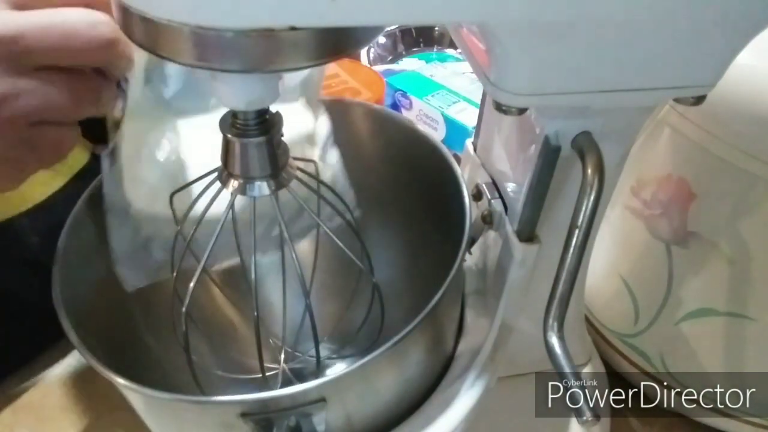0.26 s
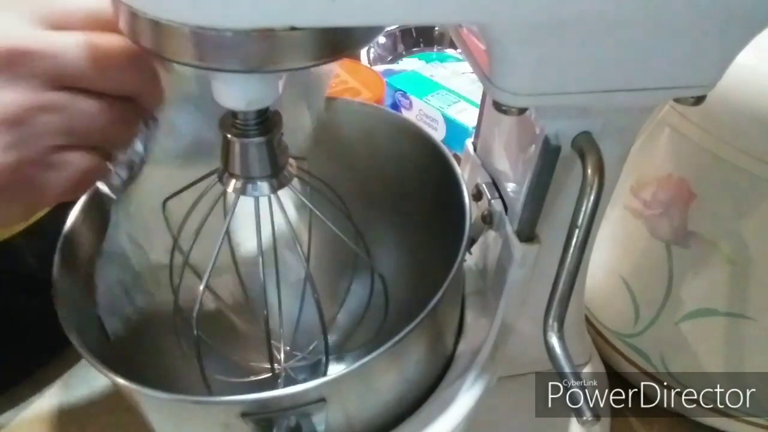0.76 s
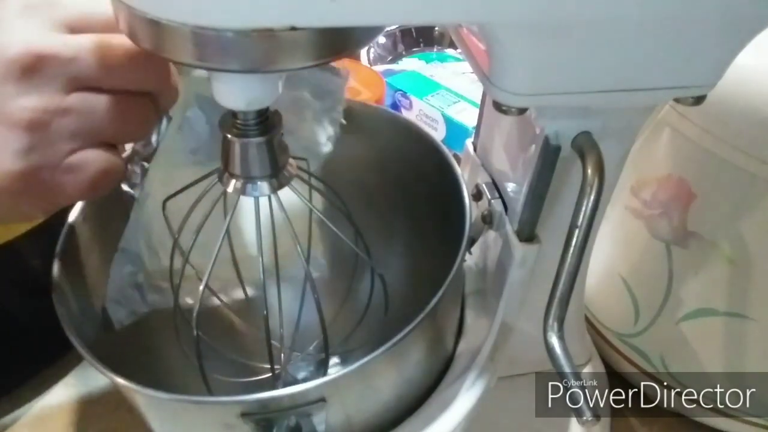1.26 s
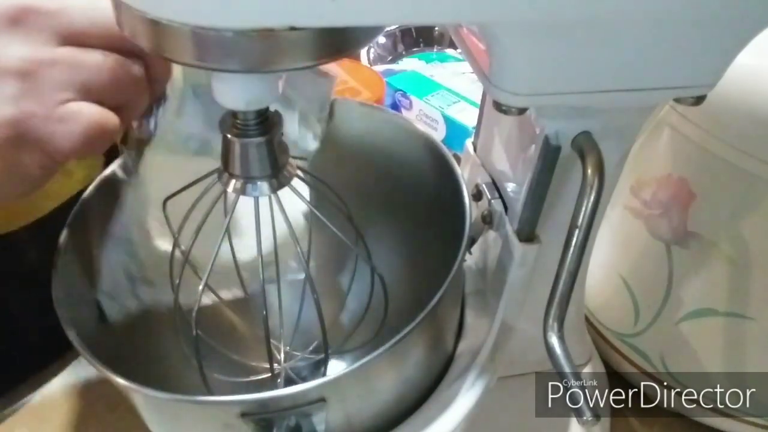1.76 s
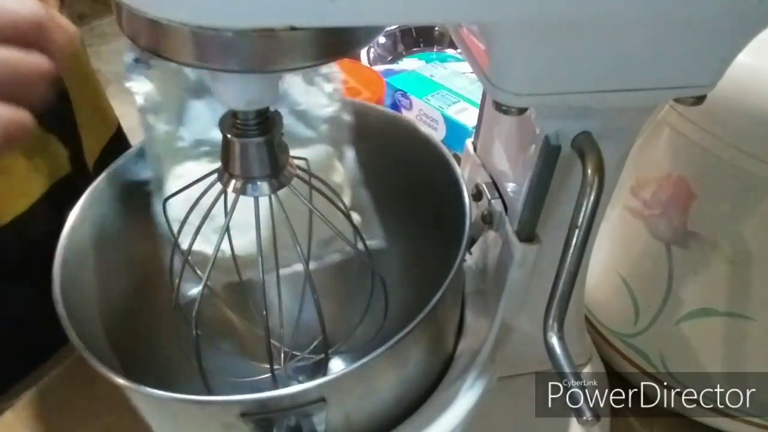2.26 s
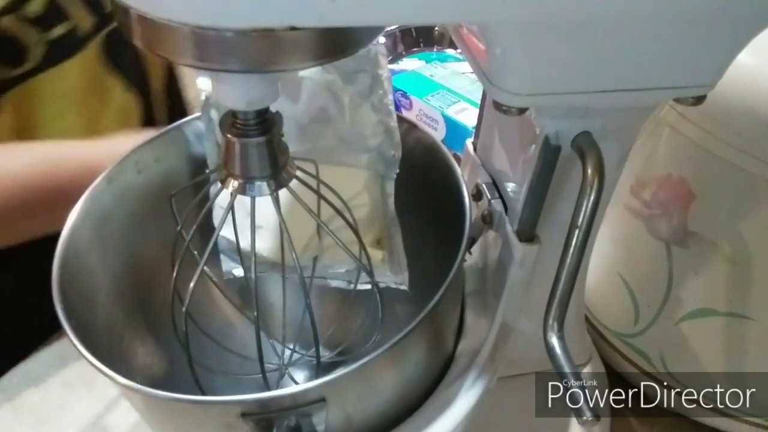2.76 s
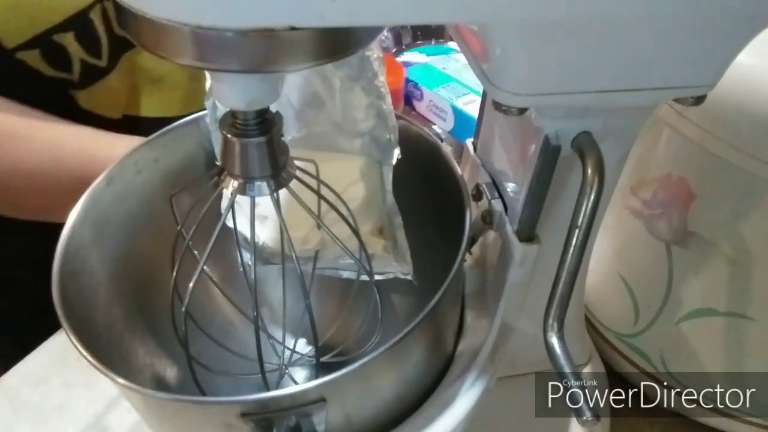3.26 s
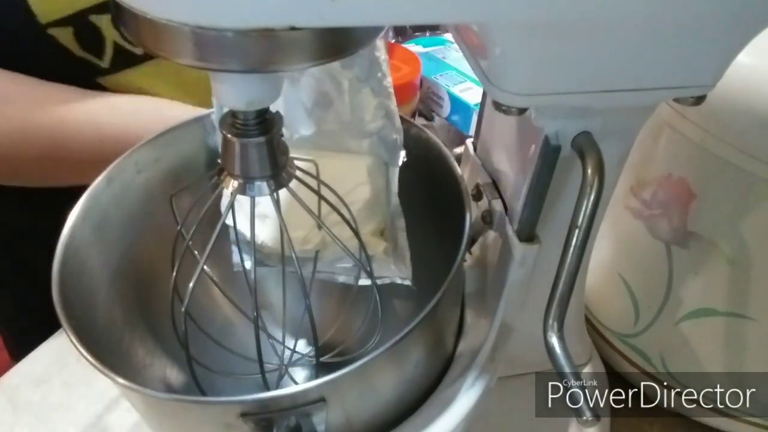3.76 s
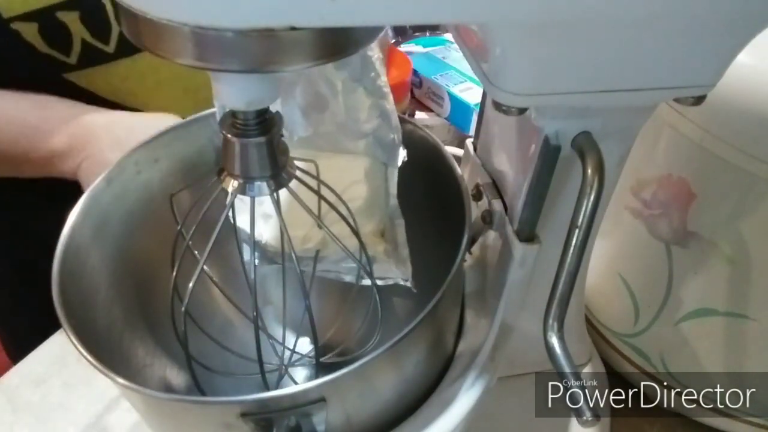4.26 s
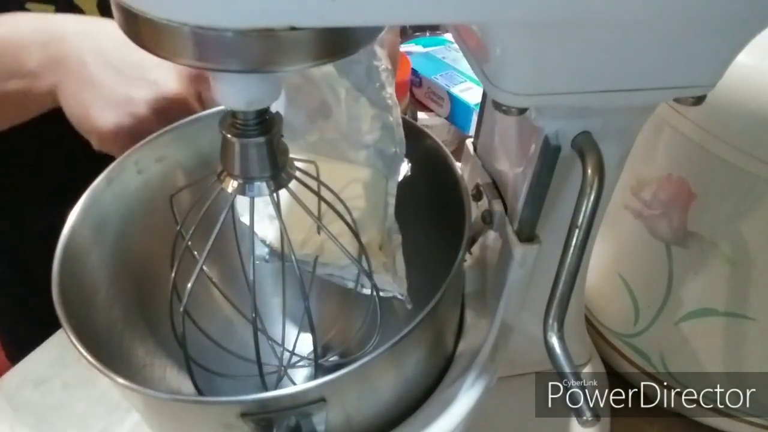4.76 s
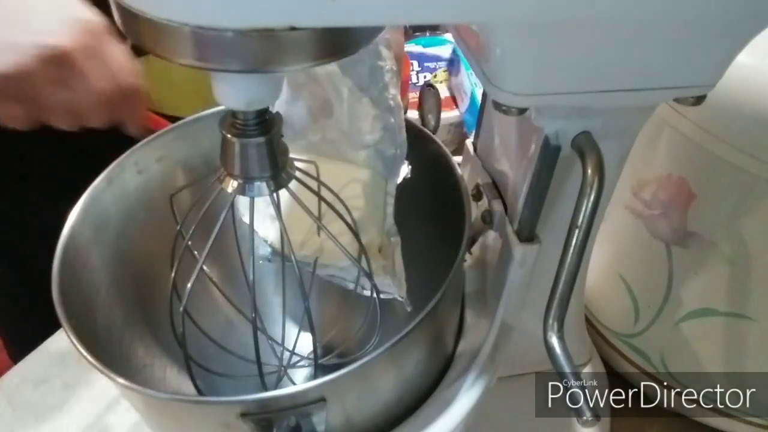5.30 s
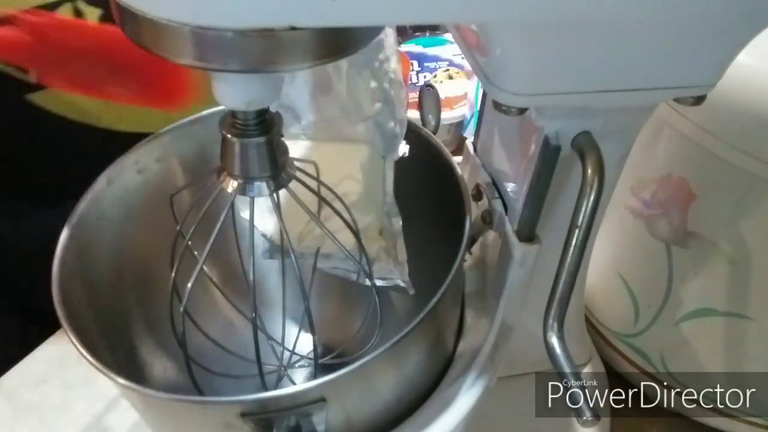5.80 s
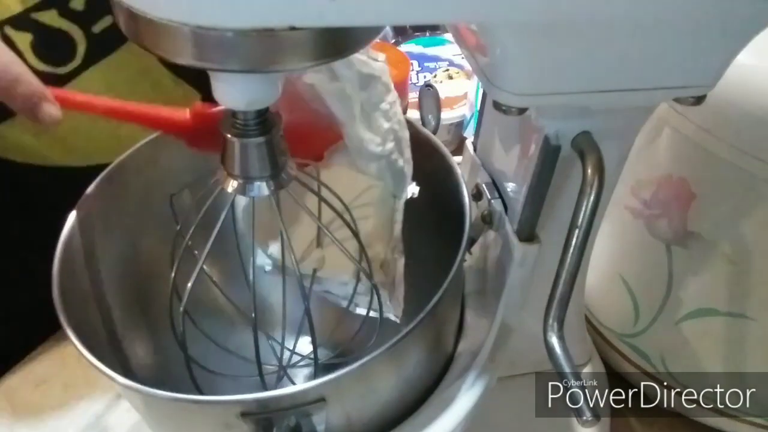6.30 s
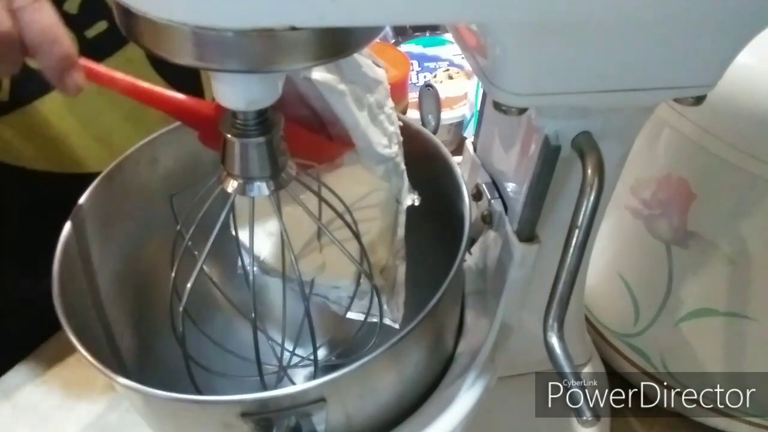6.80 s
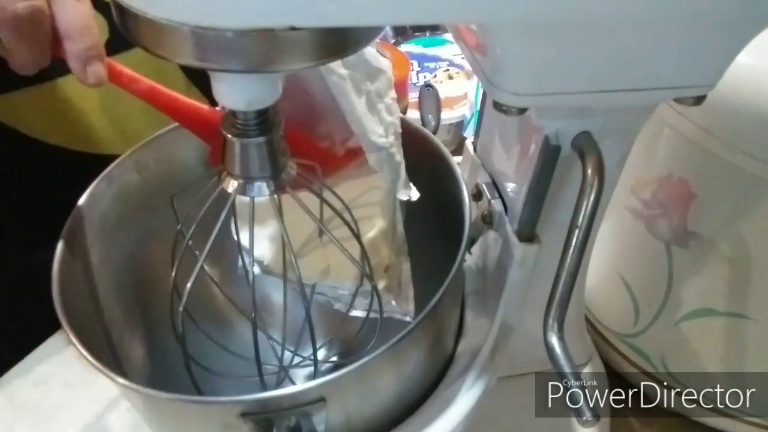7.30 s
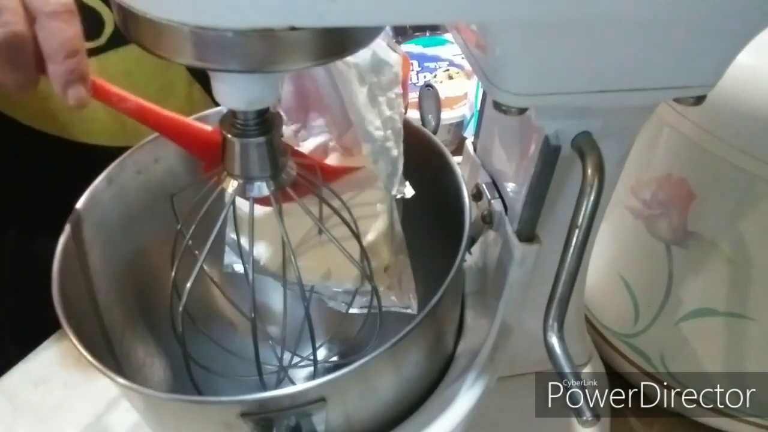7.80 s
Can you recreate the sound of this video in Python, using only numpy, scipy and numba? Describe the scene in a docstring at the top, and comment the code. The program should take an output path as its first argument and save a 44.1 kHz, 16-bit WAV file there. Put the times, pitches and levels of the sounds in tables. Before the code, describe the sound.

Close and slightly hissy: thin foil film rustles and pops in irregular bursts for over two seconds, with a hollow tint from the steel bowl. Sparse dull knocks and rubbing on a counter follow. Just past five seconds comes by far the loudest sound, a double metallic clank with a short clangy ring, then small irregular spatula taps, short scrapes and near silence in a hard-walled kitchen.

```python
"""In a small kitchen, a foil-lined wrapper of cream cheese is squeezed and crumpled over a steel mixing bowl.
Snaps, taps and bumps are short bursts of noise, shaped by filters; rubbing is a stream of tiny random slips.
Things are shifted on the counter, a metal utensil lands and tips flat, ringing as a sum of fading sine waves.
Then a spatula scrapes and taps inside the wrapper. A phone close by hears it all through a small opening
that rings near 9 kHz, and a limiter holds down the loudest peaks."""
import sys
import numpy as np
from scipy import signal
from scipy.fft import rfft, irfft
from scipy.io import wavfile
from scipy.ndimage import uniform_filter1d, minimum_filter1d
from numba import njit

SR = 44100
rng = np.random.default_rng(int(sys.argv[2]) if len(sys.argv) > 2 else 0)


def wrap_up_sound(samples):
    """Save the sound to the file named by the first command line argument, as 16-bit audio."""
    columns = np.atleast_2d(samples).T
    # keep every value between -1 and 1, then stretch to whole-number steps
    tamed = np.clip(columns, -1, 1)
    steps = np.round(tamed * 32767).astype(np.int16)
    wavfile.write(sys.argv[1], SR, steps)


N = 355005
T = np.arange(N) / SR  # time in s

# Event levels are starting points: each layer adds its own gain, and the room and microphone follow.
# held wrapper rubs between the fingers: [t/s, length/s, level/dB, hiss above that level/dB]
WRAPPER_STROKES = [(0, 0.004, -46.5, 20.5), (0.2, 0.46, -65.5, 17.5), (0.72, 0.26, -50, 20),
                   (1.0, 0.47, -51, -8.5), (1.58, 0.21, -52, 19), (1.85, 0.18, -60.5, 19),
                   (1.96, 0.088, -51.5, 12.5), (2.05, 0.22, -59, 16.5)]
# sharp snaps: foil creases, the spatula hitting foil, clicks among the handling:
# [t/s, level/dB, hiss above that level/dB]
SNAPS = [(0.0121, -58.5, 18.5), (0.388, -53, 18.5), (0.477, -39.5, 0.5), (0.6957, -50, 17.5),
         (0.7957, -40, 8), (0.821, -45, 5), (0.882, -55.5, 24), (0.915, -33, 6), (0.927, -25.5, -6),
         (1.386, -37.5, -1), (1.5269, -34, -13), (1.5444, -57, 22), (1.559, -36.5, -22),
         (1.6058, -35.5, -9), (1.6639, -34.5, -18), (1.6717, -40, 1), (1.718, -37.5, -10),
         (1.7465, -39, -14), (1.9203, -46, 5.5), (2.0757, -37.5, -8.5), (2.1599, -37.5, -1),
         (2.212, -33.5, 6), (2.2495, -40.5, 11), (2.283, -37, -6), (2.303, -34.5, 2.5), (2.3277, -54, 23.5),
         (3.086, -59, 30), (4.798, -57, 2.5), (6.0107, -47.5, 14), (7.0165, -49.5, 6.5)]
# faint chance snaps: [from t/s, to t/s, middle level/dB, hiss above the level/dB]
STRAY_SNAPS = (0.2, 2.5, -49, 4)
# fingers, packets and spatula tap on bowl and counter: [t/s, f/Hz, level/dB, edge above that level/dB]
TAPS = [(0.049, 1430, -32, -26), (0.1336, 1310, -46, -23), (3.006, 830, -42, -15),
        (3.1903, 980, -44.5, -20), (3.4123, 940, -36, -35), (3.5423, 520, -41.5, -15.5),
        (3.6199, 1770, -39.5, -16), (3.684, 1670, -43, -29), (3.9576, 1720, -41.5, -16.5),
        (4.063, 2040, -53.5, -11), (4.2697, 1120, -36, -10.5), (4.4128, 1450, -47, -19),
        (4.4497, 1620, -44.5, -8), (4.7054, 1100, -33, -28), (5.0355, 1520, -34.5, -22),
        (5.7447, 1860, -37.5, -20), (5.803, 1600, -46, -14.5), (5.9893, 1054, -39, -3.5),
        (6.0885, 1490, -53, -20), (6.146, 1710, -39, -13), (6.2424, 2160, -46, -24),
        (6.2629, 1300, -43.5, -15), (6.3225, 2060, -28, -8.5), (6.427, 2030, -40, -22),
        (6.473, 1630, -39.5, -32), (6.5498, 1820, -31, -12.5), (6.67, 1400, -56.5, -20),
        (6.9031, 2010, -48.5, -15), (7.163, 1133, -41, -17), (7.2182, 1810, -55.5, -28),
        (7.3352, 2340, -34.5, -30), (7.475, 1310, -51, -11.5), (7.783, 1887, -58.5, -28),
        (7.8059, 1773, -50, -39), (7.892, 1200, -61, -27)]
# faint chance taps: [from t/s, to t/s, middle level/dB, edge above the level/dB]
STRAY_TAPS = (3, 3.5, -48, -33)
# short runs of crackle: the wrapper is squeezed, and later a packet is handled on the counter:
# [t/s, length/s, level/dB, hiss above that level/dB]
CRACKLE_RUNS = [(0.22, 0.016, -47, -2), (0.279, 0.046, -50, 5), (0.373, 0.029, -47.5, 15.5),
                (0.402, 0.038, -40, -8.5), (0.647, 0.05, -53, 4), (0.683, 0.045, -52, 16.5),
                (0.839, 0.06, -50, 14), (0.912, 0.016, -33.5, -1.5), (0.965, 0.042, -51, 23.5),
                (1.038, 0.06, -57.5, 15.5), (1.146, 0.03, -45.5, 13.5), (1.422, 0.04, -48, -0.5),
                (1.509, 0.037, -51, 7.5), (1.603, 0.019, -42, 14.5), (1.654, 0.043, -50.5, 5.5),
                (1.703, 0.082, -45.5, 4.5), (2.129, 0.12, -50.5, 12), (2.26, 0.045, -40.5, 2.5),
                (2.457, 0.043, -61.5, 5.5), (3.211, 0.038, -45.5, 12.5)]
# soft cheese flops against the wrapper or gives under the spatula: [t/s, f/Hz, level/dB]
FLOPS = [(0.226, 670, -41), (0.69, 433, -45), (0.78, 477, -45.5), (0.844, 298, -47.5), (1.44, 550, -46),
         (1.612, 400, -47), (1.655, 424, -36), (1.712, 460, -38.5), (1.955, 383, -48.5), (2.302, 475, -39),
         (6.32, 345, -46), (6.53, 345, -50), (7.465, 340.5, -57)]
# things are pushed about on the counter: [t/s, length/s, level/dB, hiss above that level/dB]
RUMMAGE_STROKES = [(2.45, 2.1, -67.5, 6), (2.99, 0.18, -55.5, 0.5), (3.18, 0.29, -48.5, 3.5),
                   (3.405, 0.038, -43.5, -39), (3.5, 0.31, -55.5, 7), (4.19, 0.015, -47, -6),
                   (4.265, 0.014, -36.5, -4.5), (4.44, 0.017, -54.5, 7.5), (4.7, 0.031, -49, 3)]
# soft bumps on the counter: [t/s, level/dB]
BUMPS = [(3.213, -41.5), (3.41, -40), (3.691, -31), (3.734, -40), (4.207, -49), (4.721, -45),
         (4.796, -50.5)]
# utensil lands on one end, tips over and rattles flat:
# [t/s, level/dB, treble above that level/dB, lies flat 0 or 1, rings freely 0 or 1]
CLANKS = [(5.1186, -10.5, -6.5, 0, 1), (5.3229, -12, -22.5, 1, 1), (5.346, -17.5, -7, 1, 0),
          (5.365, -19.5, -18.5, 1, 0)]
# ringing modes of the utensil: [f/Hz, time to fade by 60 dB/s, level struck on end/dB, level struck flat/dB]
METAL_MODES = [(356, 0.34, -21, -17.5), (674, 0.42, -19, -17), (703, 0.413, -23.5, -19),
               (958, 0.34, -20.5, -14.5), (1011, 0.38, -14.5, -15), (1200, 0.33, -15.5, -24.5),
               (1300, 0.17, -15.5, -13), (1352, 0.35, -18, -14.5), (1410, 0.27, -14.5, -16),
               (1431, 0.27, -11.5, -13), (1700, 0.3, -22.5, -10.5), (1856, 0.3, -21.5, -15),
               (2100, 0.19, -18.5, -18), (2300, 0.35, -20.5, -10), (2405, 0.29, -14, -14),
               (2930, 0.2, -16.5, -22), (2346, .45, -15.5, -9.5), (2361.5, .45, -22, -14.5),
               (4520, .35, -14.5, -36), (4528.6, .35, -14.5, -39), (7140, 0.33, -38, -30.5),
               (8670, 0.33, -28, -41.5), (10530, 0.29, -33.5, -31), (12590, .3, -47, -39),
               (15400, .25, -50.5, -38)]
# spatula drags through the cheese: [t/s, length/s, level/dB, hiss above that level/dB]
SPATULA_STROKES = [(5.88, 0.24, -66.5, 15), (6.23, 0.18, -49.5, 11.5), (6.44, 0.12, -47, -3),
                   (6.6, 0.2, -74.5, 24), (6.79, 0.064, -70, 23), (7.44, 0.012, -49, 9)]
# hollow resonances of the bowl: [f/Hz, width/Hz, level/dB]
BOWL_MODES = [(252, 54, -0.5), (379, 49, 2.5), (965, 64, 2.5), (1062.4, 42, 2.5), (1620, 25, -2.5),
              (1860, 140, -11.5), (3700, 81.6, -10.5)]

# Tone colours: how strong each pitch region is, all [f/Hz, level/dB]
# dull body of a crackle run or tap
BODY_COLOUR = [(85, -26), (150, -11.5), (260, -10.5), (400, -4.5), (560, -2.5), (900, -9), (3000, -67.5)]
# crackling and snapping
CRACKLE_COLOUR = [(250, -11), (550, -2), (1000, -3), (1800, 0), (3200, 2), (4500, -7.5), (6500, -10.5),
                  (12000, -28)]
# fine hiss and sharp edges
HISS_COLOUR = [(2000, -20.5), (4500, -1), (6500, -4.5), (9000, 2), (11500, -2), (14000, -4), (16000, -14.5)]
# wrapper sliding
SLIDE_COLOUR = [(150, -8.5), (420, 5.5), (1000, -2), (3000, -1), (5500, -24)]
# rubbing on the counter and of the spatula
RUB_COLOUR = [(70, -27.5), (140, 0.5), (350, 6.5), (700, 3.5), (1300, 0), (2200, -2), (4000, -10.5),
              (7000, -30.5)]
# counter shaken by the utensil
THUD_COLOUR = [(40, -27), (110, -18), (200, -11.5), (330, -5), (600, -0.5), (820, -4), (1300, 1),
               (2300, -3), (3500, -9), (5000, -18), (8000, -36.5)]
# quiet kitchen air
KITCHEN_COLOUR = [(25, -13), (55, -2.5), (90, -3), (180, -3.5), (320, 2.5), (600, -4.5), (1000, -9.5),
                  (2000, -12), (4000, -14.5), (6500, -21.5), (9000, -16.5), (15000, -14.5)]
# microphone opening
PORT_COLOUR = [(25, -11.5), (55, 1.5), (6400, 1.5), (7500, 8), (8700, 15), (10000, 7), (12000, 0.5),
               (15500, -0.5)]

KITCHEN_DB, HUM_HZ, HUM_DB = -65.5, 52.33, -87  # levels before their slow drift and the microphone
TOP_HZ = 15800  # highest pitch the phone lets through
HAND_RISE_S, HAND_FALL_S = 0.0099, 0.021  # a rubbing stroke gathers speed and dies away


def undb(db):
    """Turn decibels into a gain."""
    return 10 ** (np.asarray(db) / 20)


def unit(x):
    """Scale to an average (rms) strength of 1."""
    return x / np.sqrt(np.mean(x ** 2))


def match_energy(y, x):
    """Give y the same total energy as x."""
    return y * np.linalg.norm(x) / np.linalg.norm(y)


def add(track, s, sound):
    """Mix a sound into a track at time s, in seconds."""
    i = max(0, int(s * SR))
    track[i:i + len(sound)] += sound[:N - i]


def response(points, size=4096):
    """Build a filter from an (f/Hz, level/dB) curve that responds only after the sound arrives."""
    hz, db = np.transpose(points)
    bins_hz = np.fft.rfftfreq(size, 1 / SR)
    gain = undb(np.interp(np.log(bins_hz + 1), np.log(hz), db))
    # folding the cepstrum forward puts the filter's energy as early as possible
    cepstrum = irfft(np.log(gain))
    cepstrum[1:size // 2] *= 2
    cepstrum[size // 2 + 1:] = 0
    return irfft(np.exp(rfft(cepstrum)))


def colour(x, points):
    """Give a white sound a tone colour and keep its power."""
    h = response(points)
    return signal.fftconvolve(x, h / np.linalg.norm(h))[:N]


def resonate(x, hz, width_hz):
    """Let through a band of pitches, with gain 1 at its centre."""
    return signal.lfilter(*signal.iirpeak(hz, hz / width_hz, fs=SR), x)


def wander(rate, size=N):
    """Drift randomly and smoothly, about rate new values a second, with a spread near 1."""
    k = int(SR / rate)
    steps = np.repeat(rng.standard_normal(size // k + 1), k)
    return unit(uniform_filter1d(steps, k)[:size])


def grains(rate, spread_db, size=N):
    """Tiny slips at random moments, rate per second, with strengths that vary more as spread_db grows."""
    strength = undb(spread_db * np.minimum(rng.exponential(size=size), 4))
    happens = rng.random(size) < rate / SR
    direction = rng.choice([-1, 1], size)
    return unit(happens * strength * direction + 1e-9)


def burst(t60, size=16384):
    """A damped surface shudders: noise that starts at once and fades by 60 dB in t60 seconds."""
    return rng.standard_normal(size) * undb(-60 * T[:size] / t60)


def push(t, length, rise_s, fall_s):
    """One push of the hand swells, holds and lets go."""
    swell = 1 - np.exp(-np.maximum(t, 0) / rise_s)
    return swell * np.exp(-np.maximum(t - length, 0) / fall_s)


def strays(first_s, last_s, db, treble_db, count, spread_db=4):
    """Contacts at chance moments, each with its own strength: rows of (t/s, level/dB, treble/dB)."""
    return [(first_s + when * (last_s - first_s), db + spread_db * (2 * force - 1), treble_db)
            for when, force in rng.random((count, 2))]


def folds(x, count=10, low_hz=500, high_hz=6500, sharpness=14, ring_db=7):
    """A thin sheet rings at new pitches every time its shape changes; the energy stays the same."""
    pitches = np.exp(rng.uniform(np.log(low_hz), np.log(high_hz), count))
    ringing = sum(resonate(x, hz, hz / sharpness) for hz in pitches)
    return match_energy(x + undb(ring_db) * ringing, x)


def kitchen():
    """Still room air is soft noise; an appliance hum is one faint sine. Both drift slowly in level."""
    air = colour(rng.standard_normal(N), KITCHEN_COLOUR) * undb(KITCHEN_DB + 0.54 * wander(2.0))
    hum = unit(np.sin(2 * np.pi * HUM_HZ * T))
    return air + hum * undb(HUM_DB + 1.545 * wander(4.86))


def rubbing(strokes, shape, hiss_db, rub_db, rate, spread_db):
    """Sliding contact: fine hiss from the film over coarser, uneven sticking and slipping."""
    hiss, rub = np.zeros((2, N))
    for s, length, db, treble in strokes:
        speed = push(T - s, length, HAND_RISE_S, HAND_FALL_S) * undb(db)
        rub += speed
        hiss += speed * undb(treble)
    grip = undb(2 * wander(45))
    fine = grip * hiss * undb(hiss_db) * grains(7100, 1.9)
    coarse = grip * rub * undb(rub_db) * grains(rate, spread_db)
    return colour(fine, HISS_COLOUR) + colour(coarse, shape)


def drifting_echoes(x, delay_s=0.0011, drift=0.07, strength=0.5):
    """Adds a few drifting echoes about 1 ms apart, giving the rustle a hollow, moving tone."""
    delay = delay_s * (1 + drift * wander(3.7))
    echoes = sum(strength ** k * np.interp(T - k * delay, T, x) for k in range(1, 4))
    return match_energy(x + echoes, x)


def snapping(t60=0.02, crackle_db=3.5, hiss_db=4.5, lead_s=0.0003, spike=1.6):
    """Each snap starts with a sharp spike of hiss, then shudders for a few milliseconds."""
    crackle, hiss = np.zeros((2, N))
    for s, db, treble in SNAPS + strays(*STRAY_SNAPS, count=12):
        shudder = burst(t60)
        snap = shudder * (1 + spike * np.exp(-T[:len(shudder)] / lead_s))
        add(crackle, s, folds(burst(t60)) * undb(db + crackle_db))
        add(hiss, s, snap * undb(db + treble + hiss_db))
    return colour(crackle, CRACKLE_COLOUR) + colour(hiss, HISS_COLOUR)


def tapping(t60=0.024, width=1.2, body_db=-10, tap_db=3, edge_db=5, ring_db=-2, ring_hz=1080,
            ring_width_hz=60, top_ratio=2.72, stray_hz=800, body_db_per_octave=-4):
    """Light contacts: a sharp edge, a short pitched knock and a duller body, fuller under a low knock."""
    body, knock, edge = np.zeros((3, N))
    faint = [(s, stray_hz, db, treble) for s, db, treble in strays(*STRAY_TAPS, count=8)]
    for s, hz, db, treble in TAPS + faint:
        raw = burst(t60)
        tap = resonate(resonate(raw, hz, width * hz), hz, 2 * width * hz)
        # soft contact rounds off the top
        top_hz = min(top_ratio * hz, SR / 3)
        tap = signal.sosfilt(signal.butter(3, top_hz, fs=SR, output="sos"), tap)
        # every knock wakes the same brief ping
        tap = tap + undb(ring_db) * resonate(tap, ring_hz, ring_width_hz)
        add(knock, s, match_energy(tap, raw) * undb(db + tap_db))
        fullness_db = body_db_per_octave * np.log2(hz / 1500)
        add(body, s, burst(0.08) * undb(db + body_db + fullness_db))
        add(edge, s, burst(0.043) * undb(db + treble + edge_db))
    return knock + colour(body, BODY_COLOUR) + colour(edge, HISS_COLOUR)


def crackling(rise_s=0.0023, fall_s=0.013, body_db=-5, crackle_db=-0.5, hiss_db=-1):
    """Each press on the wrapper or packet lets go a dense run of slips, and its folds colour them."""
    body, crackle, hiss = np.zeros((3, N))
    t = T[:SR // 4]
    for s, length, db, treble in CRACKLE_RUNS:
        press = push(t, length, rise_s, fall_s) * undb(db)
        add(body, s, press * undb(body_db) * grains(1100, 0.9, size=len(t)))
        add(crackle, s, folds(press * undb(crackle_db) * grains(450, 2.9, size=len(t))))
        fizz = press * undb(treble + hiss_db) * grains(6000, 1.1, size=len(t))
        add(hiss, s, folds(fizz, count=4, low_hz=7030, high_hz=12820, ring_db=-1.5))
    # the slips come in clusters, a few milliseconds each
    surge = unit(undb(2.2 * wander(170)))
    bright = colour(surge * crackle, CRACKLE_COLOUR) + colour(surge * hiss, HISS_COLOUR)
    return colour(body, BODY_COLOUR) + bright


def flopping(length_s=0.018, rise_s=0.0022, fall_s=0.016, gain_db=-1, width_hz=170):
    """The cheese gives way with a damp, hollow thump, pitched by the pocket of wrapper around it."""
    out, t = np.zeros(N), T[:SR // 4]
    for s, hz, db in FLOPS:
        squelch = push(t, length_s, rise_s, fall_s) * grains(1100, 1.0, size=len(t))
        thump = resonate(resonate(squelch, hz, width_hz), hz, 2 * hz)
        add(out, s, match_energy(thump, squelch) * undb(db + gain_db))
    return out


def bumping(hz=146, t60=0.15, gain_db=-3, upper_hz=330, upper_db=-8):
    """The counter top booms briefly in two broad modes under a soft push."""
    out = np.zeros(N)
    for s, db in BUMPS:
        blow = burst(t60)
        low = resonate(resonate(blow, hz, 55), hz, 55)
        upper = resonate(resonate(blow, upper_hz, 220), upper_hz, 220)
        boom = low + undb(upper_db) * upper
        add(out, s, match_energy(boom, blow) * undb(db + gain_db))
    return out


def clanking(thud_t60=0.26, crack_t60=0.18, thud_db=-2, crack_db=-5, ring_db=6, sway_db=2):
    """Each blow shakes the counter and a free one rings the metal; how it lands sets each mode's level."""
    thud, crack, ring = np.zeros((3, N))
    hz, t60, on_end, flat = np.transpose(METAL_MODES)[:, :, None]
    t = T[:int(.7 * SR)]
    # neighbouring modes start in opposite directions, so a close pair swells before it beats
    direction = (-1) ** np.arange(len(hz))[:, None]
    swing = direction * np.sin(2 * np.pi * hz * t)
    for s, db, treble, tipped, free in CLANKS:
        if free > .5:
            modes = undb((flat if tipped > .5 else on_end) - 60 * t / t60) * swing
            # it rocks and rolls, so the modes fade unevenly; close neighbours waver together
            rock, roll = wander(30, size=len(t)), wander(30, size=len(t))
            sway = undb(sway_db * (rock * np.cos(hz / 120) + roll * np.sin(hz / 120)))
            add(ring, s, undb(db + ring_db) * (sway * modes).sum(axis=0))
        add(thud, s, undb(db + thud_db) * burst(thud_t60))
        add(crack, s, undb(db + treble + crack_db) * burst(crack_t60))
    blows = colour(thud, THUD_COLOUR) + resonate(colour(crack, HISS_COLOUR), 5800, 4500)
    return blows, ring


def bowl(x, gain_db=-1):
    """The steel bowl lends its hollow resonances to whatever sounds inside it."""
    hollow = sum(undb(db) * resonate(x, hz, width) for hz, width, db in BOWL_MODES)
    return undb(gain_db) * (x + hollow)


def room(x, early_db=-8, early_t60=0.026, late_db=-11, late_t60=0.48, treble_t60=0.35):
    """Quick reflections from mixer and counter, then the hard walls, where treble fades sooner."""
    t = T[:int(.7 * SR)]
    early = rng.standard_normal(len(t)) * (t > .003) * undb(-60 * t / early_t60)
    noise = rng.standard_normal(len(t)) * (1 - np.exp(-t / 0.0021))
    low = signal.sosfilt(signal.butter(2, 4000, fs=SR, output="sos"), noise)
    high = signal.sosfilt(signal.butter(2, 4000, "high", fs=SR, output="sos"), noise)
    # minus, so the two bands do not cancel where they meet
    late = low * undb(-60 * t / late_t60) - high * undb(-60 * t / treble_t60)
    early = undb(early_db) * early / np.linalg.norm(early)
    late = undb(late_db) * late / np.linalg.norm(late)
    return x + signal.fftconvolve(x, early + late)[:N]


def scene():
    """Work in the bowl and on the counter, heard in the room."""
    wrapper = drifting_echoes(rubbing(WRAPPER_STROKES, SLIDE_COLOUR, hiss_db=-16.0, rub_db=-2.0,
                                      rate=1200, spread_db=0.5))
    rummage = rubbing(RUMMAGE_STROKES, RUB_COLOUR, hiss_db=-11.5, rub_db=-3.0, rate=500, spread_db=0.5)
    spatula = rubbing(SPATULA_STROKES, RUB_COLOUR, hiss_db=-14.0, rub_db=-9.5, rate=830, spread_db=2.5)
    with_bowl = bowl(wrapper + snapping() + crackling() + flopping() + spatula)
    blows, ring = clanking()
    work = room(with_bowl + rummage + bumping() + blows)
    # the taps get slightly weaker late echoes
    taps = room(bowl(tapping()), late_db=-12)
    # the ring skips room(): its fade times already include the room
    return (work + taps + ring + kitchen())[None]


@njit
def follow(x, release):
    """Peak level that jumps up at once and sinks slowly."""
    out, level = np.empty(len(x)), 0.
    for i in range(len(x)):
        level = max(abs(x[i]), level * (1 - release))
        out[i] = level
    return out


def record(dry, ceiling=0.66, release_s=0.018):
    """The microphone opening rings, a limiter holds the peaks down and the top is cut."""
    x = signal.fftconvolve(dry[0], response(PORT_COLOUR))[:N]
    peak = follow(x, 1 / (release_s * SR))
    needed_gain = np.minimum(1, ceiling / (peak + 1e-9))
    # turn down a little ahead of each peak, smoothly, over 45 samples (about 1 ms)
    gain = uniform_filter1d(minimum_filter1d(needed_gain, size=45), size=45)
    top_cut = signal.ellip(10, .2, 80, TOP_HZ, fs=SR, output="sos")
    return signal.sosfilt(top_cut, x * gain)[None]


dry = scene()
out = record(dry)
wrap_up_sound(out)
```